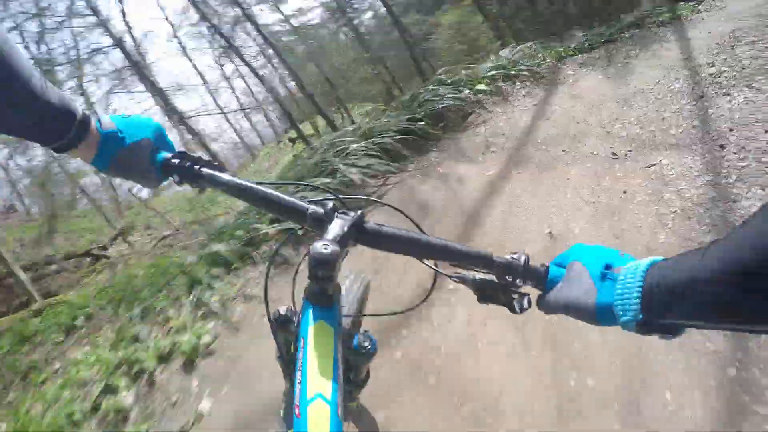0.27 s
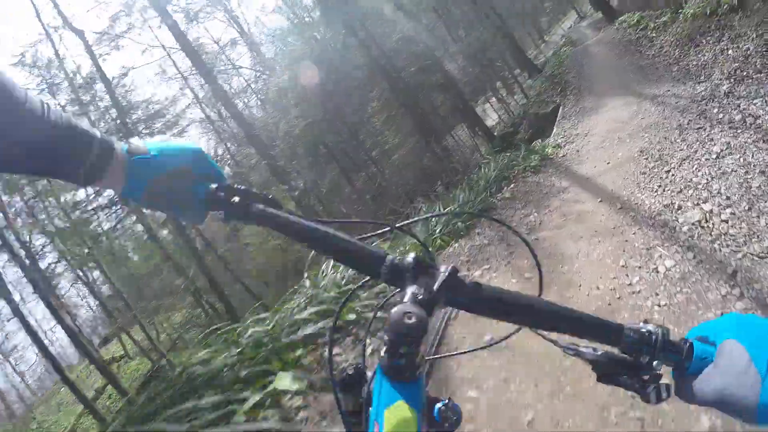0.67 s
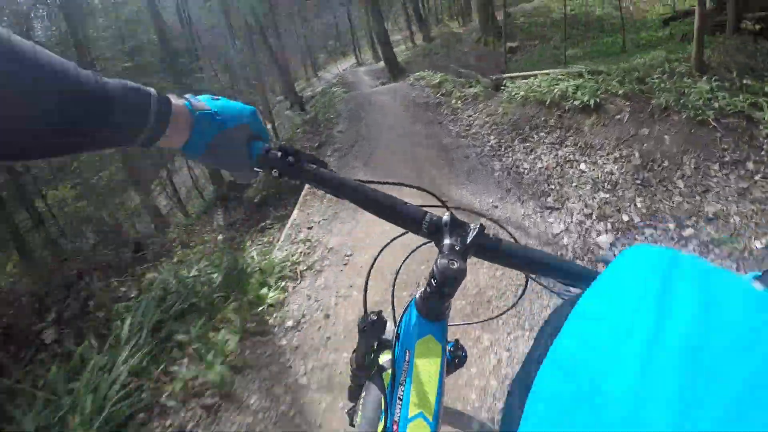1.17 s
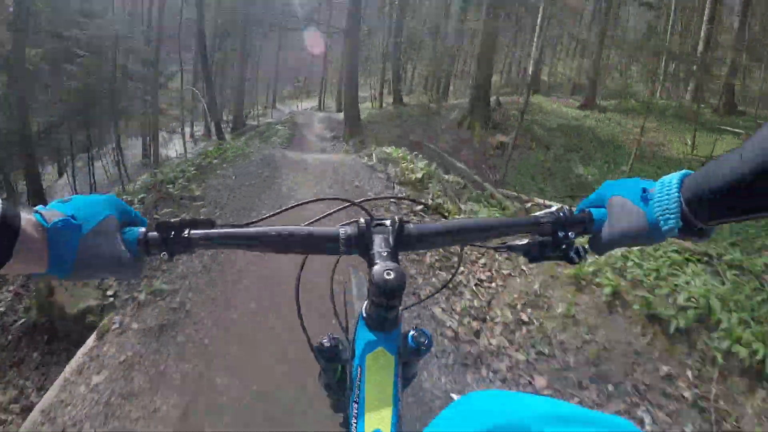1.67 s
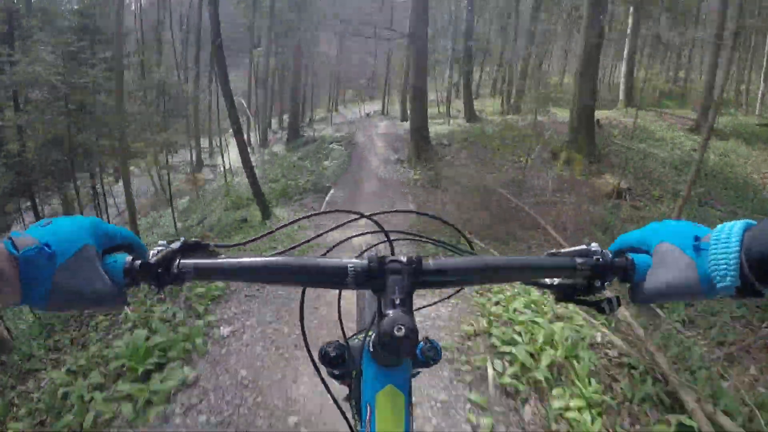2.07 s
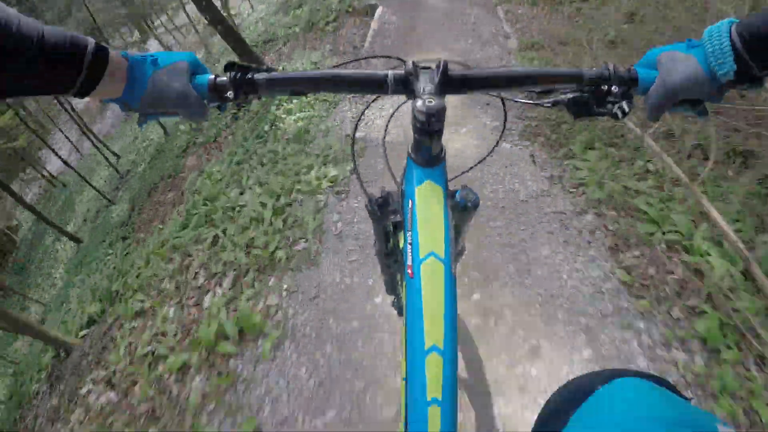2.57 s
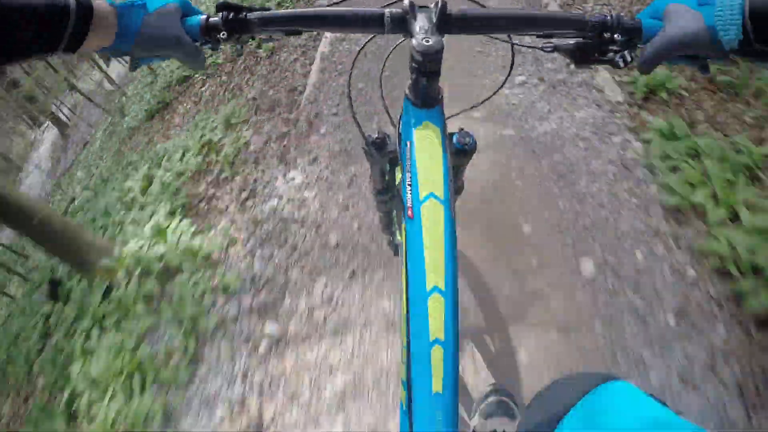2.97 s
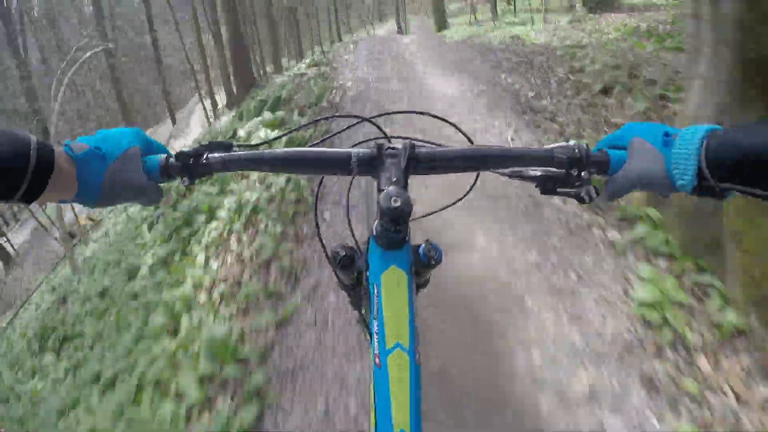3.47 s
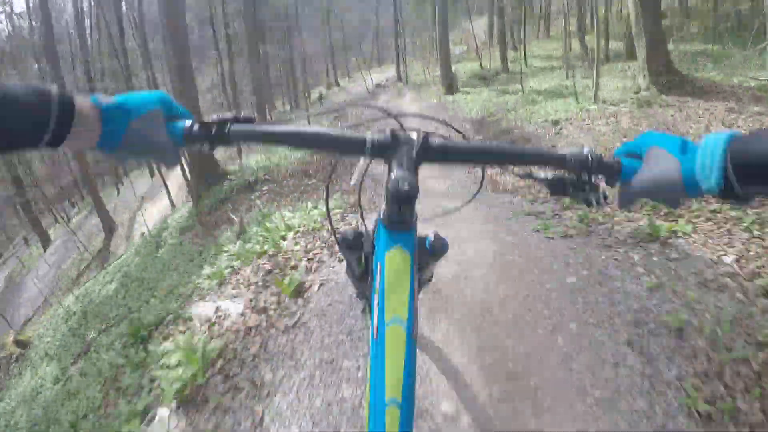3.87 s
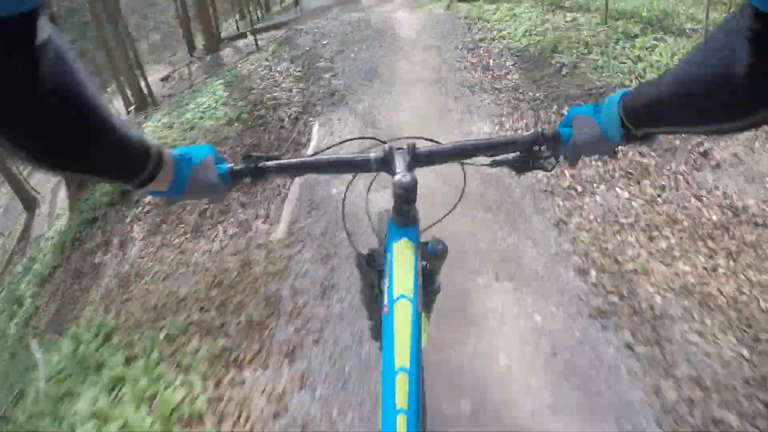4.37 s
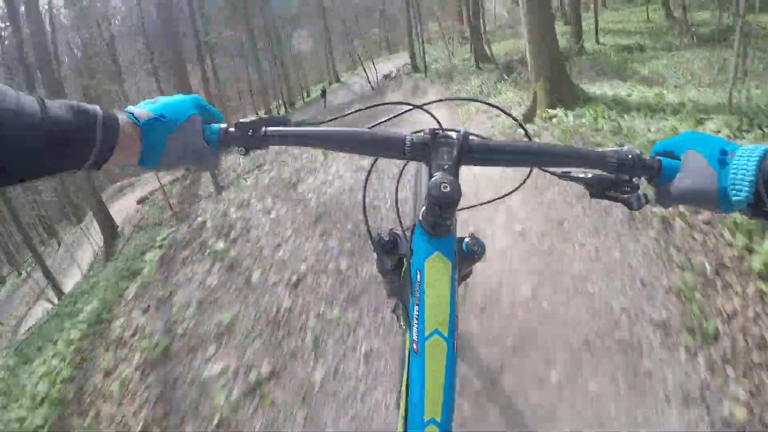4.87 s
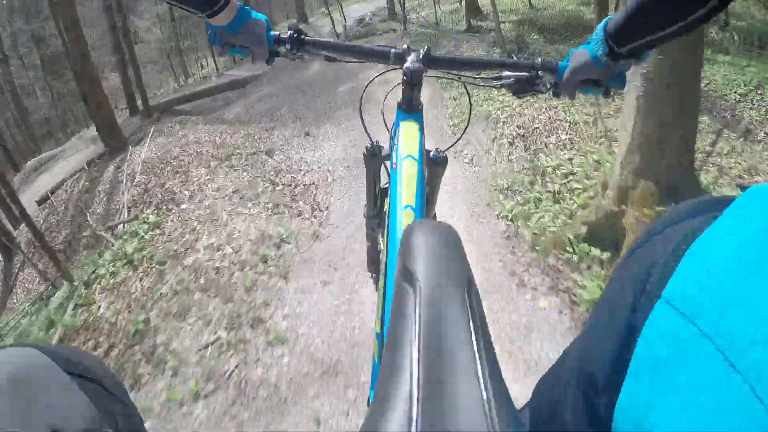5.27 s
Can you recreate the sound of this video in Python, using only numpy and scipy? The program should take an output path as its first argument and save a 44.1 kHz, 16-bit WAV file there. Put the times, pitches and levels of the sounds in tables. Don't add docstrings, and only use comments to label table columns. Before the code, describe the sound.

Close, muffled bike descent with deep jolts and wind buffeting, tyre rumble, clattering loose parts, scrubbing brakes and a heavy bump near the end.

```python
import sys
import numpy as np
from scipy import signal
from scipy.fft import rfft, irfft, next_fast_len
from scipy.io import wavfile
from scipy.ndimage import map_coordinates

SR = 44100
rng = np.random.default_rng(int(sys.argv[2]) if len(sys.argv) > 2 else 0)


def int16_out(signal):
    q = np.round(np.clip(np.atleast_2d(signal).T, -1, 1) * 32767)
    wavfile.write(sys.argv[1], SR, q.astype(np.int16))


def gain_from_decibels(decibels):
    exponent = np.asarray(decibels, float) / 20
    return 10 ** exponent


N = 242991
TIME = np.arange(N) / SR
COARSE = np.arange(0, N + 32, 32)


def unit(x):
    return x / np.sqrt(np.mean(x ** 2) + 1e-20)


def curves(rows):
    s, *columns = np.transpose(rows)
    return [np.interp(COARSE / SR, s, column) for column in columns]


def wobble(rate):
    knots = rng.standard_normal(int(N * rate / SR) + 4)
    return map_coordinates(knots, [COARSE * rate / SR])


def fine(slow):
    return np.interp(np.arange(N), COARSE, slow)


def summed(*levels_db):
    return 10 * np.log10(sum(gain_from_decibels(db) ** 2 for db in levels_db))


def swells(times, peaks_db, lengths):
    away = (COARSE / SR - times[:, None]) / np.maximum(lengths, .01)[:, None]
    away = np.where(away > 0, away / 1.22, -away)
    levels_db = peaks_db[:, None] - 20 * away ** 1.32
    return 10 * np.log10((gain_from_decibels(levels_db) ** 2).sum(axis=0) + 1e-12)


def chatter(hz, depth_db):
    cycle = np.cumsum(fine(hz * (1 + 0.32 * wobble(30)))) / SR % 1
    depth = depth_db * fine(np.clip(1 + 0.067 * wobble(4.0), 0, 2))
    return depth * (.5 - cycle)


def filtered(x, response):
    m = next_fast_len(len(x) + SR // 2)
    return irfft(rfft(x, m) * response(np.fft.rfftfreq(m, 1 / SR)), m)[:len(x)]


def coloured(x, spectrum):
    hz, db = np.transpose(spectrum)
    return unit(filtered(x, lambda f: gain_from_decibels(np.interp(np.log(f + 1), np.log(hz), db))))


def rung(x, modes, roof_hz):
    def body(f):
        total = 0
        for k, (centre, width, db) in enumerate(modes):
            resonance = 1j * f * width / (centre * centre - f * f + 1j * f * width)
            total = total + (-1) ** k * gain_from_decibels(db) * resonance
        return total / (1 + 1j * f / roof_hz) ** 2 / (1 + 1j * f / 7000) ** 2
    return filtered(x, body)


def grains(rate, spread_db, smooth):
    place, size, sign = rng.random((3, int(rate * N / SR)))
    strength = np.sqrt(-np.log(1 - np.abs(2 * sign - 1) + 1e-9))
    scatter = gain_from_decibels(spread_db * np.minimum(-np.log(size + 1e-9), 2.2))
    impacts = np.bincount((place * N).astype(int), np.sign(sign - .5) * strength * scatter, N)
    return unit(unit(impacts) + smooth * rng.standard_normal(N))


def strikes(times, peaks, rise, t60, response):
    out, t = np.zeros(N + SR), np.arange(SR // 40) / SR
    envelope = (1 - np.exp(-t / rise)) * gain_from_decibels(-60 * t / t60)
    bursts = rng.standard_normal((len(times), len(t))) * envelope
    rings = signal.fftconvolve(bursts, np.atleast_2d(response), axes=1)
    for s, peak, ring in zip(times, peaks, rings):
        out[round(s * SR):][:len(ring)] += peak * ring / np.abs(ring).max()
    return out[:N]


def ringing(rows, cycles, rise, t60):
    s, db, hz = np.transpose(rows)
    turns = hz[:, None] * np.arange(SR // 25) / SR
    rings = gain_from_decibels(-60 * turns / cycles) * (1 - np.exp(-turns)) * np.sin(2 * np.pi * turns)
    return strikes(s - rise, gain_from_decibels(db), rise, t60, rings)


# time in seconds, peak in dB, swing in Hz.
JOLTS = [(0.026, -23, 10), (0.08, -20, 22), (0.222, -10.5, 28.6), (0.31, -19.5, 20.6), (0.388, -16.5, 31),
         (0.431, -24.5, 23), (0.492, -10, 23.3), (0.632, -13, 36), (0.678, -17, 22), (0.719, -16, 29),
         (0.789, -15.2, 18), (0.88, -13.5, 27), (1.092, -23, 11), (1.231, -22.5, 21), (1.572, -21.5, 33),
         (1.608, -14.5, 27), (2.582, -23, 34), (2.941, -16, 18), (3.098, -9.5, 25.4), (3.143, -18, 28),
         (3.337, -26, 11), (3.429, -19.5, 16.4), (4.195, -23, 42), (4.424, -20, 40), (4.54, -22.5, 24),
         (4.622, -19, 25), (4.677, -20.5, 14), (4.778, -22.5, 16), (5.135, -8, 26), (5.196, -22.5, 14.5),
         (5.486, -28, 55), (5.52, -21, 34), (1.94, -26, 26), (4.05, -25, 31)]


def jolts():
    out = np.zeros(N)
    for s, db, hz in JOLTS:
        near = slice(max(round(s * SR) - SR // 8, 0), round(s * SR) + SR // 8)
        u = (TIME[near] - s) * 4 * hz
        out[near] -= gain_from_decibels(db) * u * np.exp((1 - u * u) / 2)
    return out


# time in seconds, wind level in dB.
WIND = [(0, -33), (.6, -27.5), (1.2, -32), (1.8, -37.5), (2.4, -35), (2.9, -29.5), (3.4, -35.5), (3.9, -31),
        (4.4, -35), (4.8, -30), (5.51, -33.5)]
# frequency in Hz, density in dB per Hz.
BUFFET_COLOUR = [(5, 1.5), (14, 4.5), (30, 8), (45, -5), (65, -17.5), (95, -56.5)]


def buffeting():
    wind_db = curves(WIND)[0]
    return fine(gain_from_decibels(wind_db + 0.55 * wobble(7.7))) * coloured(rng.standard_normal(N), BUFFET_COLOUR)


# time in seconds, peak in dB, bending pitch in Hz.
THUDS = [(.18, -27.5, 147), (0.656, -26.5, 107), (3.2, -32, 125), (4.566, -25, 174), (4.6, -25.5, 122),
         (5.106, -20, 111.6), (.45, -33, 114), (.95, -36, 110), (1.95, -34.5, 75), (4.07, -35, 70)]


def thuds():
    out, t = np.zeros(N), np.arange(-SR // 20, SR // 20) / SR
    for s, db, hz in THUDS:
        thud = np.exp(-(t * hz / 1.34) ** 2) * np.sin(2 * np.pi * hz * t)
        out[round(s * SR) - SR // 20:][:len(t)] += gain_from_decibels(db) * thud
    return out


# time in seconds, gravel coarseness in dB, tyre scrub under braking in dB.
TRAIL = [(0, -50.5, -48), (.26, -49.5, -55), (.4, -49.5, -59), (.6, -53, -51), (.9, -57.5, -54.5),
         (1.3, -50.5, -54), (1.6, -59.5, -61), (2.2, -60, -68), (2.35, -64, -60), (2.7, -56.5, -53.5),
         (3.3, -59.5, -52.5), (3.6, -57.5, -46), (3.91, -60, -47), (3.96, -54.5, -58.5), (4.38, -56.5, -48),
         (4.5, -60.5, -40), (5.12, -48.5, -46), (5.51, -56.5, -89)]
# time in seconds, rumble in dB, fall in seconds, drone against rumble in dB.
LOADS = [(.192, -40, 0.59, -15), (.656, -41, 0.16, -4.5), (1.048, -39, 0.13, -9.5), (1.439, -45, .18, -13),
         (1.73, -40.5, 0.11, -10), (2.08, -42.5, 0.29, -9), (2.41, -38, 0.15, -18), (2.9, -42, 0.74, -14.5),
         (3.17, -39, 0.3, -8), (3.42, -42, 0.81, -7.5), (4.33, -38, 0.48, -14.5), (4.56, -33, 0.17, -10.5),
         (5.1, -39.5, 0.63, -10), (5.33, -41, 0.21, -31)]
# frequency in Hz, density in dB per Hz.
RUMBLE_COLOUR = [(50, 0.5), (65, 13.5), (115, 7.5), (150, 1), (200, -43.5)]
# frequency in Hz, density in dB per Hz.
DRONE_COLOUR = [(130, 4), (180, 3), (270, -3), (350, -9.5), (460, -46)]


def rolling():
    gravel_db, _ = curves(TRAIL)
    s, load_db, length, lean_db = np.transpose(LOADS)
    roll_db = 0.45 * (gravel_db - gravel_db.mean())
    rumble_db = summed(-53.5 + roll_db, swells(s, load_db, length))
    drone_db = summed(-56.5 + roll_db, swells(s, load_db + lean_db, length))
    rumble = fine(gain_from_decibels(rumble_db + 0.5 + 2.6 * wobble(25))) * coloured(grains(300, 1.1, 0.56), RUMBLE_COLOUR)
    drone = fine(gain_from_decibels(drone_db + 2.5 + 2.7 * wobble(35))) * coloured(grains(400, 1.8, 0.43), DRONE_COLOUR)
    return rumble + drone


# time in seconds, strength in dB, fall in seconds, door looseness in dB.
BUMPS = [(.1, -50, 0.29, 9), (0.305, -44, 0.032, 3), (.435, -48.5, 0.053, 5), (0.664, -38, 0.079, 4),
         (.765, -49.5, 0.042, 12.5), (.963, -47, 0.026, -1), (1.075, -45, 0.06, 2.5),
         (1.237, -56.5, 0.098, 14), (1.306, -41, 0.047, 7.5), (1.42, -46.5, 0.073, 3),
         (1.5, -52, 0.092, 10.5), (1.735, -42, 0.095, 3.5), (1.955, -45.5, 0.14, -4), (.21, -45, 0.053, 1),
         (2.081, -46, 0.08, 0.5), (2.428, -48, 0.06, 14), (2.514, -54.5, 0.044, 12),
         (2.808, -47.5, 0.052, 12), (2.875, -46.5, 0.057, 2), (2.949, -47.5, 0.036, 6),
         (3.13, -43.5, 0.26, 2), (3.499, -46, 0.093, 5.5), (3.907, -47.5, 0.042, 7), (4.02, -58, 0.075, 6),
         (4.199, -43.5, 0.074, 1.5), (4.27, -56, 0.078, 9), (4.31, -46, 0.084, -2), (4.584, -40.5, 0.11, 4),
         (5.199, -42.5, 0.051, 0), (5.308, -54.5, 0.09, 9.5)]
# level in dB on gravel, on scrub and on a bump,
# then share of the door's looseness (0 to 1).
ANSWERS = [(-2.5, -11, -3.5, 0.33), (-3, 1, -1, 0), (1.5, -1.5, -0.5, 0.81), (-1.5, -6.5, -4, 0.48)]


def rattles():
    gravel_db, scrub_db = curves(TRAIL)
    s, bump_db, length, loose_db = np.transpose(BUMPS)
    levels_db = []
    for on_gravel, on_scrub, on_bump, share in ANSWERS:
        bumped_db = swells(s, bump_db + on_bump + share * loose_db, length)
        levels_db.append(summed(gravel_db + on_gravel, scrub_db + on_scrub, bumped_db))
    return levels_db


# time in seconds, peak in dB,
# place (0 lid, 1 mount, 2 door, 3 latch), loss from part to part in dB.
KNOCKS = [(.2526, -29, 0.8, 5), (0.3491, -28, 2, 3), (0.625, -24.5, 0, 8), (0.6432, -19.5, 0.6, 7.5),
          (0.7883, -35, 1.7, 0), (1.0167, -34, -1.5, 1), (1.299, -17.5, 1.4, 15), (1.7714, -37, 0.2, -1.5),
          (1.9154, -23.5, 0.7, 9.5), (2.012, -18, 0.96, 6), (2.0314, -30.5, 0.3, 8), (2.0971, -15, 1.3, 9),
          (2.129, -33, 0, 8), (2.7844, -41, 1.6, 2), (2.9408, -31.5, 3.5, 14), (2.965, -24.5, 1.5, 15),
          (3.107, -16.5, 1.3, 22), (3.505, -28, 2, 0), (3.5184, -33, 0.17, 1), (3.5396, -32, -0.5, 3),
          (3.614, -25, 0.99, 30), (3.652, -24, 1.1, 24), (3.882, -27, 1.3, 10), (3.975, -26, 1.7, 9),
          (4.402, -34, 2.5, 12), (4.343, -31, 1.5, 19), (4.444, -21, 1.5, 28), (4.565, -28.5, 2.5, -1.5),
          (4.776, -21, 1, 21), (5.3128, -28.5, 0.91, 12)]
# time in seconds, peak in dB, place as above, loss from part to part in dB.
CLICKS = [(0.1117, -26, 2.3, 17), (0.424, -34, 3.6, 4), (0.5998, -24, 2.53, 10.5), (0.756, -21.5, 2.05, 19),
          (0.767, -23, 2, 12), (0.8124, -27, 3.2, 8), (0.9633, -26.5, 2.9, 14), (1.161, -32.5, 3, 7),
          (1.2152, -30, 1.95, 18), (1.2723, -23, 2.7, 4), (1.3023, -14.5, 3, 12),
          (1.3216, -16.5, 1.74, 8.5), (1.4624, -28, 2, 23), (1.5399, -27.5, 2.02, 14), (2.56, -37, 3, 11),
          (2.7144, -36.5, 3, 2), (3.058, -23, 2.1, 10), (4.1763, -21, 1.9, 6.5), (4.1973, -23, 2.3, 5.5),
          (4.231, -28.5, 2.5, 3.5), (4.252, -34, 2.05, 14), (4.29, -22, 3.3, 4), (4.2654, -30, 2, 19),
          (4.2812, -40, 2, 15), (4.381, -30, 3, 6), (4.518, -30, 2, 15), (4.597, -19.5, 2, 20),
          (4.688, -25.5, 2.7, 7), (4.8718, -14, 1.74, 21.5), (5.0886, -19, 1.53, 10)]
# frequency in Hz, width in Hz, level in dB.
LID = [(474, 130, -8), (628.5, 28, 1), (991, 314, -3)]
MOUNT = [(1384, 277, 3.8), (1944, 820, 5.2)]
DOOR = [(2427, 143, -.5), (3070, 370, -10)]
LATCH = [(3600, 280, 12), (4397, 410, 5), (5700, 1000, -5), (6370, 530, -6)]
# frequency in Hz, width in Hz.
STRUCK = [(920, 320), (1770, 330), (2430, 180), (3700, 170)]


def case():
    clump_db = 0.5 * wobble(45) + 1.25 * wobble(97)
    shared = grains(1400, 3.9, 1.0)
    s, peak_db, place, loss_db = np.transpose(KNOCKS + CLICKS)
    knocks_db = peak_db - loss_db * np.abs(np.arange(len(STRUCK))[:, None] - place)
    # modes, wall roof in Hz, shake in dB, chatter depth in dB
    parts = [(LID, 2500, .6, 3), (MOUNT, 4000, .7, 5), (DOOR, 4100, .8, 8), (LATCH, 6000, .9, 9)]
    tap, out = np.arange(SR // 25) == 0, np.zeros(N)
    for part, main, level_db, knock_db in zip(parts, STRUCK, rattles(), knocks_db):
        modes, roof_hz, shake_db, loose_db = part
        shaking = gain_from_decibels(fine(clump_db + 1.66 * wobble(51)) + chatter(95, loose_db))
        drive = shaking * (shared + 0.63 * grains(500, 4.0, 1.0))
        out += fine(gain_from_decibels(level_db + shake_db)) * unit(rung(drive, modes, roof_hz))
        ring = rung(tap, [(*main, 0)], roof_hz)
        out += strikes(s - .0011, gain_from_decibels(knock_db), .0004, .009, ring)
    return out


# time in seconds, peak in dB, pitch in Hz.
PINGS = [(0.0538, -30, 2320), (0.4229, -37, 2360), (0.5846, -38, 2530), (0.632, -24.5, 2330),
         (0.6953, -25, 2380), (0.9487, -34, 3500), (1.723, -30, 2200), (1.7689, -38, 1790),
         (2.376, -40, 2370), (2.395, -34, 2500), (2.4079, -33, 2470), (2.4199, -32, 2500),
         (2.4997, -36, 2430), (2.7804, -33, 2520), (2.7891, -34, 2400), (2.8065, -32, 2430),
         (2.9228, -33, 2450), (3.467, -34, 2440), (3.4835, -31, 2300), (3.913, -35.5, 1410),
         (4.4248, -38, 1710), (4.447, -25.5, 1660), (4.479, -29, 1800), (4.4, -35, 1650),
         (4.612, -27, 2300), (4.542, -29, 2430), (4.4623, -28, 1780), (4.5635, -32, 2370),
         (4.6299, -27.5, 1910), (4.6633, -30, 1640), (4.7366, -32, 2340), (4.7935, -33, 1650),
         (4.8504, -27, 2450), (4.8943, -34, 1540), (4.9257, -29, 1760), (5.0075, -31, 1980),
         (5.031, -30, 2560), (5.0614, -29, 3580), (5.1143, -40, 1480), (5.1277, -27.5, 2450),
         (5.1617, -34, 2440), (5.1721, -32, 1670), (5.1821, -34.5, 1330)]
# time in seconds, peak in dB, pitch in Hz.
MORE_PINGS = [(.657, -27, 2430), (.669, -31, 2420), (.677, -32, 2430), (.745, -32, 2440), (1.276, -27, 3730),
              (1.286, -33, 3600), (1.306, -21, 3600), (1.311, -26, 2200), (1.332, -31, 2430), (2.43, -30, 2430),
              (2.44, -32, 2470), (2.453, -29, 2440), (2.953, -32, 1730), (3.518, -29.5, 2100),
              (3.519, -35, 3750), (3.539, -41, 3700), (3.665, -32, 1920), (4.767, -32, 3750),
              (1.2995, -19, 2930), (1.3025, -24.5, 1540), (1.282, -32, 2700), (3.8806, -35, 2460),
              (4.519, -31, 2200), (3.615, -26.5, 1750), (0.124, -29, 2430), (.138, -31, 2400),
              (2.818, -33.5, 2420), (4.599, -16.5, 2430), (1.468, -29, 2430), (1.474, -32, 2450),
              (4.957, -32, 3650), (5.023, -29, 2430)]
# time in seconds, peak in dB, pitch in Hz.
TAPS = [(0.108, -39, 623), (0.208, -50, 358), (0.291, -35, 982), (0.303, -31.5, 1030), (0.423, -35.5, 990),
        (0.622, -30.5, 985), (0.687, -35, 958), (0.746, -39, 646), (0.937, -39, 953), (1.272, -41, 740),
        (1.298, -38, 397), (1.696, -43, 991), (1.729, -38, 1040), (1.934, -39, 1130), (1.954, -35, 930),
        (2.213, -47, 970), (2.783, -42, 710), (2.881, -36.5, 900), (3.146, -48, 380), (3.502, -42, 890),
        (4.174, -34.5, 610), (4.195, -36, 600), (4.257, -36, 1040), (4.288, -36, 610), (4.56, -38, 430),
        (5.192, -35, 920)]
# time in seconds, peak in dB, pitch in Hz.
SPITS = [(0.0466, -43, 5670), (0.0897, -43, 6620), (0.1266, -41, 5600), (0.1376, -43, 5840),
         (0.1471, -40, 6450), (0.3441, -48, 5610), (0.637, -42, 6010), (0.8465, -46, 6650),
         (1.0156, -48, 6620), (1.064, -42, 5620), (1.1323, -47, 6220), (1.1847, -43, 5650),
         (1.2381, -51, 7160), (1.6901, -46, 5660), (1.7679, -48, 6080), (3.679, -48, 5680),
         (4.176, -38, 5740), (4.1964, -43, 5630), (4.369, -48, 6290), (4.4474, -48, 5780),
         (4.6104, -44, 5520), (4.6856, -43, 6100), (4.7556, -45, 8850), (4.9555, -46, 6340),
         (4.9965, -46, 6600), (5.0135, -44, 7110), (5.3093, -51, 6600)]
# time in seconds, peak in dB, pitch in Hz.
MORE_SPITS = [(1.324, -38, 6800), (1.302, -47, 12800), (.515, -43, 10800)]


def stones():
    pings = ringing(PINGS + MORE_PINGS, 35, .0006, 0.0057)
    taps = ringing(TAPS, 6.8, 0.00036, 0.0056)
    sand = ringing(SPITS + MORE_SPITS, 19, .00015, 0.014)
    return pings + taps + sand


# first contact in seconds, peak in dB, gap in seconds,
# number of contacts, loss at each in dB.
BOUNCES = [
    (4.209, -31, 0.011, 2, 3),
    (4.2458, -35, .011, 1, 0),
    (4.299, -25.5, .0093, 4.7, 1.8),
]
# frequency in Hz, width in Hz, level in dB.
CATCH = [(1300, 500, -9), (3740, 150, 0)]


def latch():
    contacts = []
    for s, db, gap, count, loss_db in BOUNCES:
        contacts += [(s + gap * k, db - loss_db * k) for k in range(round(count))]
    s, db = np.transpose(contacts)
    tap = np.arange(SR // 25) == 0
    return strikes(s - .001, gain_from_decibels(db), 0.0004, 0.0024, rung(tap, CATCH, 6000))


# time in seconds, level in dB, pitch in Hz.
GRIT = [(.195, -50, 7000), (0.512, -42, 8500), (.5985, -37, 12500), (0.599, -41.5, 7000),
        (0.8108, -42, 7500), (.974, -48, 10500), (1.1598, -46, 7260), (1.2715, -50, 11500),
        (1.2999, -50, 9000), (1.324, -48, 7450), (1.538, -43, 5500), (2.011, -46, 9050),
        (2.0965, -46, 6170), (2.5591, -52, 7100), (2.7144, -53, 7100), (3.056, -49, 6000),
        (3.1063, -45.5, 9000), (3.1892, -45, 7000), (3.5024, -56, 6500), (4.2882, -52, 9500),
        (4.3344, -51, 9000), (4.4644, -55, 11000), (4.5196, -47, 9000), (4.563, -45, 8000),
        (4.6593, -48, 12500), (4.8289, -47, 8800)]


def grit():
    t, out = np.arange(SR // 1000) / SR, 0
    for s, db, hz in GRIT:
        tick = np.diff(np.exp(-np.pi * .25 * hz * t) * np.sin(2 * np.pi * hz * t))
        out = out + strikes([s], [gain_from_decibels(db + 4)], 0.0002, 0.013, tick)
    return out


# frequency in Hz, density in dB per Hz.
SKID_COLOUR = [(4000, -20), (4700, 0), (6300, -3), (6800, -22)]


def skid():
    bump_db = swells(*np.transpose(BUMPS)[:3])
    return fine(gain_from_decibels(bump_db - 17.5 + 3.4 * wobble(40))) * coloured(grains(1300, 4, 1.5), SKID_COLOUR)


# frequency in Hz, density in dB per Hz.
SING_COLOUR = [(5800, -15), (7000, 6), (8200, -6), (9500, 7), (10800, -14), (12000, -22)]
# frequency in Hz, density in dB per Hz.
SQUEAL_COLOUR = [(12700, -25), (13400, 0), (14100, -25)]
# frequency in Hz, width in Hz, level in dB.
FORK = [(266, 28, -1), (440, 30, -8)]


def brakes():
    _, scrub_db = curves(TRAIL)
    squeal_db = swells(*np.transpose([(4.88, -71, .35)]))
    sing = fine(gain_from_decibels(scrub_db - 23 + 1.1 * wobble(30))) * coloured(grains(1000, 5, 0.95), SING_COLOUR)
    squeal = fine(gain_from_decibels(squeal_db)) * coloured(grains(900, 3, 2), SQUEAL_COLOUR)
    hum = fine(gain_from_decibels(scrub_db - 16.5 + 2.7 * wobble(12))) * unit(rung(rng.standard_normal(N), FORK, 900))
    return sing + squeal + hum


# time in seconds, level in dB, fall in seconds.
PUFFS = [(.045, -58, 0.04), (.102, -56, .04), (.2, -55, 0.027), (.24, -52, 0.026), (.35, -58, 0.026),
         (.39, -59, 0.045), (.475, -58, .04), (.515, -52.5, 0.025), (.668, -61, 0.12), (.803, -55, .035),
         (.858, -55.5, 0.043), (.92, -62, .05), (.98, -66, .05), (1.31, -61, .06), (1.721, -60, 0.1),
         (1.955, -69, .06), (2.928, -66, .05), (3.12, -61, 0.095), (3.45, -63, 0.097), (3.809, -68, 0.33),
         (4.46, -57, 0.03), (4.527, -61, .04), (4.68, -58, 0.055), (4.755, -59, 0.037), (4.95, -65, .2),
         (5.15, -55.5, 0.059)]
HISS_DB = (-12, -45, -20.5, -5)
# frequency in Hz, density in dB per Hz.
HISS_COLOUR = [(4200, 1), (5600, 1), (7000, -5), (8200, -10), (9600, -5.5), (10800, -10), (13000, -49)]
# frequency in Hz, density in dB per Hz.
FIZZ_COLOUR = [(4500, 4.5), (8000, 0.5), (11000, -1.5), (15000, -4)]


def port_air():
    gravel_db, scrub_db = curves(TRAIL)
    wind_db, puff_db = curves(WIND)[0], swells(*np.transpose(PUFFS))
    bump_db = swells(*np.transpose(BUMPS)[:3])
    sources_db = (gravel_db, scrub_db, bump_db, puff_db)
    hiss_db = summed(*[db + leak_db for db, leak_db in zip(sources_db, HISS_DB)])
    fizz_db = summed(-74 + 1.8 * (wind_db + 33), puff_db)
    flap = gain_from_decibels(chatter(17, 5))
    hiss = fine(gain_from_decibels(hiss_db + 5 + 2.5 * wobble(25))) * coloured(grains(1500, 4, 2), HISS_COLOUR)
    flutter_db = 3 + 0.8 * wobble(28) + 2 * wobble(70)
    fizz = fine(gain_from_decibels(fizz_db + flutter_db)) * coloured(grains(1200, 5, 2), FIZZ_COLOUR)
    return flap * (hiss + fizz)


# first tick in seconds, peak in dB, ticks a second, number of ticks.
RATCHET = [
    (2.196, -61, 40, 8),
    (3.26, -61, 100, 34),
    (4.66, -63, 98, 24),
    (5.302, -57.5, 72, 15),
]


def freewheel():
    ticks = []
    for s, db, rate, count in RATCHET:
        ticks += [(s + k / rate, db, 9700) for k in range(round(count))]
    uneven = rng.normal(0, [.0004, 1.5, 200], (len(ticks), 3))
    return ringing(ticks + uneven, 25, .001, .02)


# frequency in Hz, level in dB rms.
WHINE = [(14146, -86), (14176, -84)]


def whine():
    out = 0
    for hz, db in WHINE:
        level = fine(gain_from_decibels(db + 3 * wobble(6)))
        out = out + level * np.sin(2 * np.pi * hz * TIME + fine(1.3 * wobble(14)))
    return out


def scene():
    body = jolts() + buffeting() + thuds() + rolling()
    impacts = case() + stones() + latch() + grit()
    background = skid() + brakes() + port_air() + freewheel() + whine()
    return (body + impacts + background)[None]


def top_cut(x):
    return signal.sosfilt(signal.butter(12, 15490, fs=SR, output="sos"), x)


def record(dry):
    mix = filtered(dry[0], lambda f: f < 15320)[None]
    return top_cut(mix)


dry = scene()
out = record(dry)
int16_out(out)
```